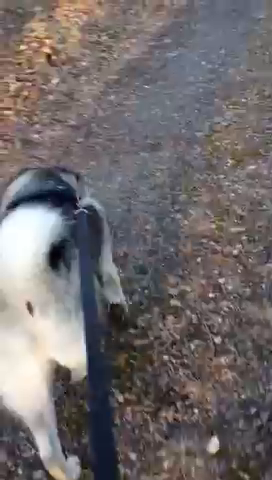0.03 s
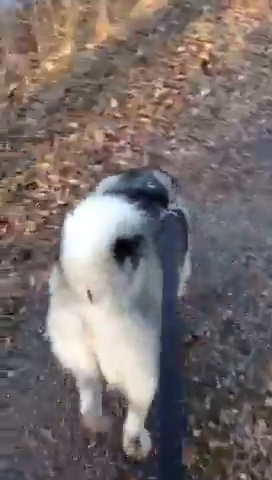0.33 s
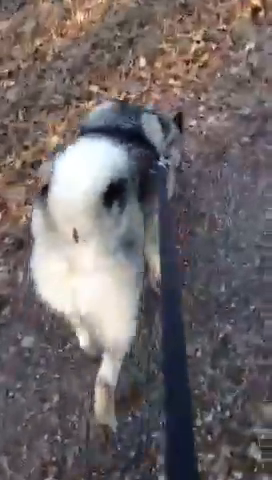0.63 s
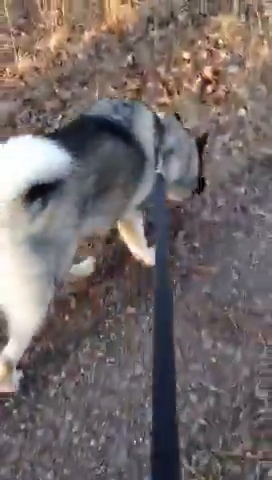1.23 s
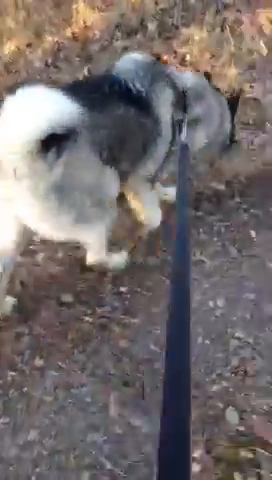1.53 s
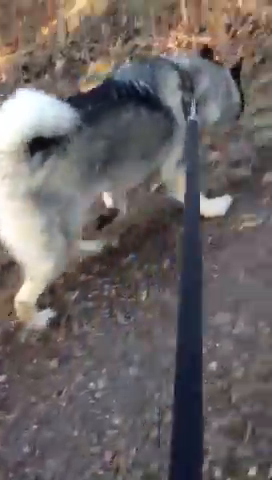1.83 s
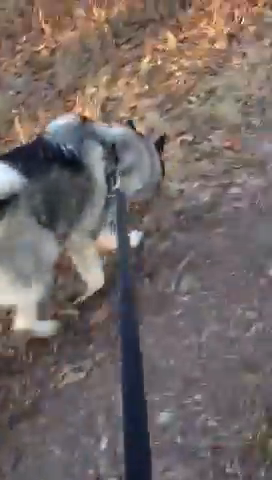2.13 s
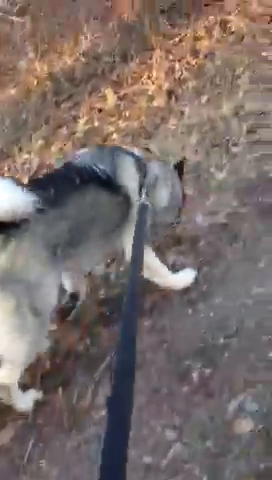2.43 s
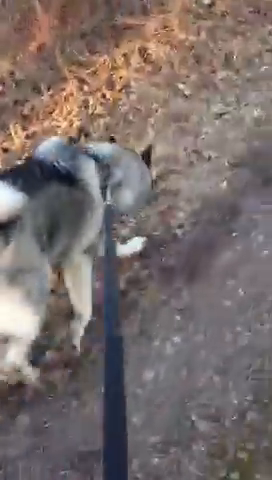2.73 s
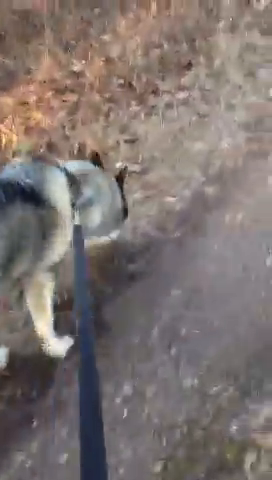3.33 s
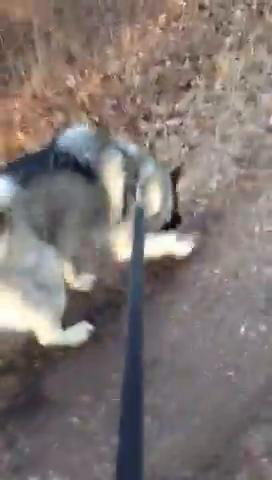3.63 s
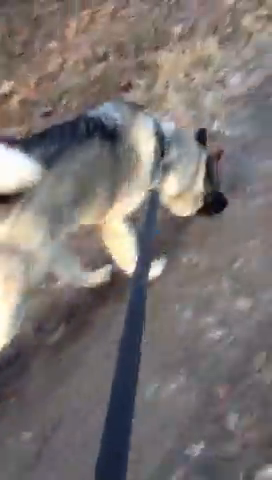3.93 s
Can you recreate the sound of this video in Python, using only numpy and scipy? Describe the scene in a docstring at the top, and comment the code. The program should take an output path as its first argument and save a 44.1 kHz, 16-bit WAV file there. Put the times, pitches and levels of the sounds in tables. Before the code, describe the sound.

Metal dog tags jingle and click against a leash clip in quick, uneven bursts throughout. A low wind rumble runs underneath, with a few faint gravel crunches and soft steps, heard from the walker's hand on an outdoor path.

```python
"""A gravel path in an open park, where a dog trots on a leash, heard from the walker's hand.
Two metal tags knock and chatter against the leash clip: each impact excites their natural modes,
which ring briefly until the next touch damps them. Stones grind and snap underfoot and steps
thud faintly, beneath a low rumble of wind and the broadband wash of the park."""
import sys
import numpy as np
from scipy import signal
from scipy.fft import rfft, irfft
from scipy.io import wavfile
from scipy.ndimage import uniform_filter1d

SR = 44100
rng = np.random.default_rng(int(sys.argv[2]) if len(sys.argv) > 2 else 0)


def generate_wav(signal):
    """Clip the signal to [-1, 1] and save it as 16-bit WAV at the path in sys.argv[1]."""
    frames = np.transpose(np.atleast_2d(signal))
    scaled = np.clip(frames, -1, 1) * 32767
    pcm = np.round(scaled).astype(np.int16)
    wavfile.write(sys.argv[1], SR, pcm)


N = 176400

# Levels in the tables are relative.
# spectra of the wind with the park, and of the hiss: frequency_hz, level_db
AIR_SPECTRUM = [(15, -53), (25, -30.5), (38, -33), (59, -25.5), (129, -3.5), (149, 0), (201, -3),
                (374, -19), (569, -15), (1020, -15), (1640, -23), (3000, -39), (3900, -48), (6600, -120)]
HISS_SPECTRUM = [(2000, -26), (3000, 0), (4500, 1.5), (5300, -6), (9000, -5.5), (15000, -6.5)]
# slow course of the wind: time_s, level_db
WIND_LEVELS = [(.1, -1), (2.0, -0.5), (2.8, 1.2), (4, 0)]
# natural modes of the tags: pitch_hz, free_t60_s, after_touch_db, chatter_db
TAG_MODES = [(5120, .24, -10, -15), (6176, .28, -9, -14), (10060, .16, -16, -2), (13195, .22, -10, -5),
             (13770, .18, -11, 0)]
# impacts of the tags: start_s, tick_db, then level_db for each of the five modes
TAG_KNOCKS = [(0.1189, -20, -58, -62, -28.5, -53, -42), (0.443, -45, -72, -70, -46.5, -58, -50),
              (0.851, -29.5, -72, -59, -50, -56, -56), (0.881, -31, -70, -46.5, -37, -47, -37),
              (0.9694, -28, -57, -66, -46, -45, -49), (1.17, -26.5, -62, -74, -50, -40, -41),
              (1.201, -32, -58, -55, -48, -53, -55), (1.3334, -39, -80, -63, -72, -46, -44),
              (1.392, -33, -71, -70, -41, -64, -59), (1.5697, -22, -50, -68, -35.5, -46, -32.5),
              (1.696, -18.5, -47.5, -50, -42, -36, -31), (1.8923, -18, -56, -66, -39.5, -43, -52),
              (1.9274, -42, -72, -60, -59, -41, -38), (2.1822, -32, -67, -54, -41, -48, -53),
              (2.346, -23, -71, -41.5, -45, -47, -45), (2.4546, -33, -52, -53, -49, -48, -62),
              (2.508, -30, -46, -65, -63, -47, -32.5), (2.5415, -16, -61, -43.5, -31, -36, -30),
              (2.6302, -20, -65, -55, -38, -52, -41), (2.6389, -28, -58, -48.5, -54, -35, -31),
              (2.7886, -35, -61, -66, -52, -44.5, -50), (2.8744, -44, -62, -59, -50, -53, -51),
              (2.979, -23, -44.5, -69, -46.5, -34, -40), (3.053, -30, -65, -60, -47.5, -45, -51),
              (3.1807, -42, -54, -70, -41, -54, -42), (3.2018, -26, -56, -67, -37.5, -46, -55),
              (3.3096, -24, -75, -54, -30.5, -44, -38), (3.3388, -31, -75, -70, -40.5, -59, -57),
              (3.4993, -31, -65, -55, -35.5, -54, -45), (3.5234, -34, -66, -64, -37, -57, -57),
              (3.6639, -16, -44, -49, -29.5, -41, -41), (3.8474, -27, -52, -74, -35.5, -45, -33),
              (3.8649, -27, -70, -65, -40, -43, -35), (3.8983, -39, -72, -77, -50, -34, -36),
              (3.96, -27, -68, -55, -60, -48, -35)]
# dry impacts of the leash clip: start_s, level_db
CLIP_CLICKS = [(.836, -36), (.9635, -38), (1.310, -28), (1.988, -26.5), (2.299, -24.5), (2.560, -23.5),
               (2.571, -24), (2.939, -29), (3.4475, -20)]
# spectrum of a metal contact: frequency_hz, level_db
METAL_SPECTRUM = [(2000, -22), (4000, -4), (7000, 1.5), (10000, 5.5), (13700, 3.5), (16000, -10)]
# gravel yielding under a foot: start_s, length_s, level_db
CRUNCHES = [(.395, 0.11, -54), (.917, 0.044, -46), (.96, 0.074, -57.5), (2.0, 0.11, -60),
            (2.485, 0.07, -58), (3.56, 0.063, -51), (3.62, 0.054, -60)]
# spectrum of grinding gravel: frequency_hz, level_db
GRAVEL_SPECTRUM = [(600, -10), (1700, 2), (4000, 0), (5500, -7), (9000, -13), (15000, -21)]
CHATTERS = [(.40, 0.13, -58), (.905, 0.12, -58), (1.41, 0.066, -55), (1.578, 0.011, -44.5),
            (1.698, 0.029, -62), (1.848, 0.05, -49.5), (1.895, 0.083, -51.5), (2.03, 0.15, -57),
            (2.125, 0.054, -58.5), (2.297, 0.018, -50), (2.35, 0.061, -50), (2.497, 0.042, -43.5),
            (2.542, 0.029, -58), (2.618, 0.068, -46), (2.68, 0.076, -52.5), (3.21, 0.096, -52),
            (3.31, 0.13, -57.5), (3.446, 0.016, -42.5), (3.525, 0.042, -45.5), (3.60, 0.056, -53),
            (3.664, 0.031, -37.5), (3.69, 0.079, -61), (3.842, 0.04, -51), (3.892, 0.022, -46),
            (3.95, 0.055, -47)]
# heavy steps and buffets: start_s, level_db
THUDS = [(0.906, -24.5), (2.399, -19.5), (2.729, -24), (2.823, -25), (2.837, -22.5), (2.899, -27)]
# stones snapping and, last, one clack of the leash clip: start_s, level_db, pitch_hz, grind_decay_s
SHARP_CRACKS = [(0.9334, -18, 2500, 0.00029), (0.939, -39, 4000, 0.0023), (2.0168, -29, 1950, 0.0026),
                (2.290, -33, 3580, 0.001), (3.448, -22.5, 3630, 0.0021)]


def undb(db):
    """Decibels to amplitude ratio."""
    return 10 ** (np.asarray(db) / 20)


def unit(x):
    """Normalise to rms 1."""
    return x / np.sqrt(np.mean(x ** 2) + 1e-20)


def add(out, start_s, x):
    """Superpose a sound from a given time."""
    i = int(np.clip(start_s * SR, 0, N - 1))
    out[i:i + len(x)] += x[:N - i]


def colour(x, spectrum):
    """Spectral shaping that conserves the power of white noise."""
    hz, db = np.array(spectrum).T
    f = np.maximum(np.fft.rfftfreq(N, 1 / SR), 1)
    gain = unit(undb(np.interp(np.log(f), np.log(hz), db)))
    return irfft(rfft(x) * gain, N)


def drift(rate_hz):
    """Slow random modulation, rms 1."""
    k = int(SR / rate_hz)
    held = np.repeat(rng.standard_normal(N // k + 1), k)
    return unit(uniform_filter1d(uniform_filter1d(held, k), k)[:N])


def impacts(per_s, spread_db):
    """A Poisson train of unequal impulses, rms 1."""
    size = undb(spread_db * np.clip(rng.standard_normal(N), -2, 2))
    return unit((rng.random(N) < per_s / SR) * size * rng.choice([-1, 1], N))


def swells(rows):
    """An amplitude envelope with one rounded arch per row."""
    out = np.zeros(N)
    for start, length, db in rows:
        add(out, start, undb(db) * np.sqrt(2 * np.hanning(max(int(length * SR), 8))))
    return out


def noise_bursts(hits, decay_s):
    """Each impulse spreads its energy into exponentially decaying noise."""
    r = np.exp(-2 / (decay_s * SR))
    power = signal.lfilter([1 - r], [1, -r], hits ** 2 + 1e-18)
    return np.sqrt(power) * rng.standard_normal(N)


def air(edge_hz=330, gust_db=.3, flutter_db=.9):
    """Amplitude-modulated noise: wind flutters in the bass, under a steadier wash and faint hiss."""
    t = np.arange(N) / SR
    noise = undb(-35.5) * colour(unit(rng.standard_normal(N)), AIR_SPECTRUM)
    low = signal.sosfiltfilt(signal.butter(4, edge_hz, fs=SR, output="sos"), noise)
    trend_db = np.interp(t, *np.array(WIND_LEVELS).T)
    wind = low * undb(trend_db + gust_db * drift(29) + flutter_db * drift(29.93))
    wash = (noise - low) * undb(.5 * drift(14))
    hiss = undb(-62.5) * colour(rng.standard_normal(N), HISS_SPECTRUM)
    return wind + wash + hiss


def tag_knocks(damping_s=.0045, detune_hz=20, buzz=.16, buzz_hz=300, twin_hz=5944):
    """Free vibration: struck modes ring until contact damping leaves only a faint remainder."""
    out, t = np.zeros(N), np.arange(SR // 5) / SR
    attack = np.minimum(t / .0003, 1)
    buzz_band = signal.butter(2, buzz_hz, fs=SR, output="sos")
    for start, _, *mode_db in TAG_KNOCKS:
        for k, (hz, t60, after_touch_db, _) in enumerate(TAG_MODES):
            detune, phase, late = rng.standard_normal(3)
            free_s = .0051 * np.exp(.4 * late)  # each mode is caught in its own time
            touch = np.exp(-np.maximum(t - free_s, 0) / damping_s)
            envelope = attack * 1000 ** (-t / t60) * np.maximum(touch, undb(after_touch_db))
            # grazing roughens both amplitude and phase
            graze = buzz * unit(signal.sosfilt(buzz_band, rng.standard_normal((2, len(t)))))
            cycles = (hz + detune_hz * detune) * t + phase
            ring = (1 + graze[0]) * np.sin(2 * np.pi * cycles + graze[1])
            if k == 0:  # the lowest mode has a weaker partner
                ring += undb(-5) * np.sin(2 * np.pi * twin_hz * t)
            add(out, start, 2 * undb(mode_db[k] - 6.5) * envelope * ring)
    return out


def metal_ticks(decay_s=.00098):
    """A brief contact has a broad spectrum: tags and clip click as they are struck."""
    out, t = np.zeros(N), np.arange(SR // 50) / SR
    for start, db, *_ in list(TAG_KNOCKS) + list(CLIP_CLICKS):
        add(out, start, undb(db - 11.5) * np.exp(-t / decay_s) * rng.standard_normal(len(t)))
    return colour(out, METAL_SPECTRUM)


def gravel(grain_s=.0009):
    """Shot noise: dense collisions merge into a crunch underfoot; loose grit ticks throughout."""
    grains = impacts(per_s=1100, spread_db=4.5) * swells(CRUNCHES)
    crunch = colour(noise_bursts(grains, grain_s), GRAVEL_SPECTRUM)
    loose = noise_bursts(impacts(per_s=80, spread_db=4.5), grain_s)
    return crunch + undb(-70) * loose


def tag_chatter(t60_s=.05, bend_hz=35, shift_db=5, shifts_per_s=45):
    """Forced vibration: runs of tiny contacts scrape the half-damped tags and drive their modes."""
    t = np.arange(N) / SR
    contacts = impacts(per_s=1300, spread_db=3.8) * swells(CHATTERS)
    contacts += impacts(per_s=22, spread_db=3.8) * undb(-79 + 3.5 * t)  # the tags never hang still
    r = np.exp(-np.log(1000) / (t60_s * SR))
    ring = np.zeros(N)
    for hz, _, _, db in TAG_MODES:
        # sliding contact points favour now one mode, now another, and bend their pitch
        drive = contacts * rng.standard_normal(N) * unit(undb(shift_db * drift(shifts_per_s)))
        bend = np.exp(2j * np.pi * np.cumsum(bend_hz * drift(shifts_per_s)) / SR)
        pole = r * np.exp(2j * np.pi * hz / SR)
        mode = np.sqrt(1 - r * r) * signal.lfilter([1], [1, -pole], drive)
        ring += undb(db) * (mode * bend).imag
    scrape = colour(noise_bursts(contacts, decay_s=.002), METAL_SPECTRUM)
    return undb(-2.5) * ring + undb(-6.5) * scrape


def thuds(pitch_hz=173, rise_s=.0047):
    """Heavy damping: a step or buffet gives a low pulse of only a few cycles."""
    out, t = np.zeros(N), np.arange(SR // 10) / SR
    envelope = (t / rise_s * np.exp(1 - t / rise_s)) ** 2
    for start, db in THUDS:
        add(out, start, -undb(db) * envelope * np.sin(2 * np.pi * pitch_hz * t))
    return out


def sharp_cracks(q=1.7):
    """Low-Q resonance with brief noise in the same band: stones snap, and the leash clip clacks once."""
    out, t = np.zeros(N), np.arange(SR // 10) / SR
    for start, db, hz, decay_s in SHARP_CRACKS:
        band = signal.iirpeak(hz, q, fs=SR)
        crack = np.exp(-np.pi * hz / q * t) * np.sin(2 * np.pi * hz * t)
        grind = unit(signal.lfilter(*band, signal.lfilter(*band, rng.standard_normal(len(t)))))
        add(out, start, undb(db) * (undb(-6) * np.exp(-t / decay_s) * grind - crack))
    return out


def scene():
    """Linear superposition of all the sources at one point."""
    mix = air() + tag_knocks() + metal_ticks() + gravel() + tag_chatter() + thuds() + sharp_cracks()
    return mix[None]


def record(dry):
    """Gating and band limiting: the sound opens after a moment, its highest treble cut off."""
    start_s, cutoff_hz = .083, 15400
    gate = np.arange(N) / SR >= start_s
    return signal.sosfilt(signal.ellip(8, .2, 70, cutoff_hz, fs=SR, output="sos"), dry * gate)


dry = scene()
out = record(dry)
generate_wav(out)
```